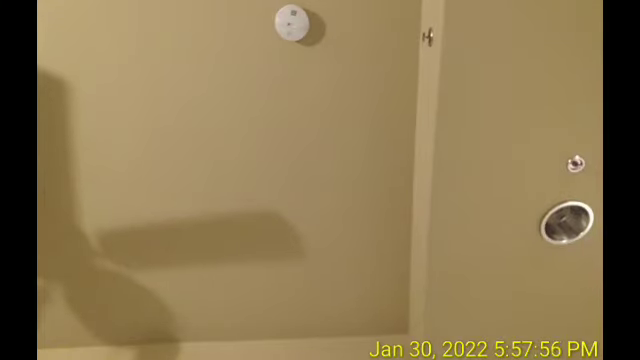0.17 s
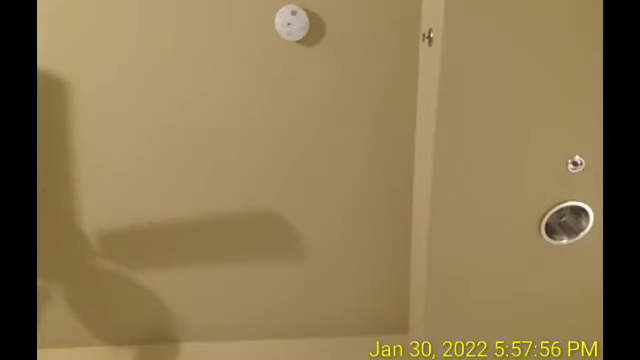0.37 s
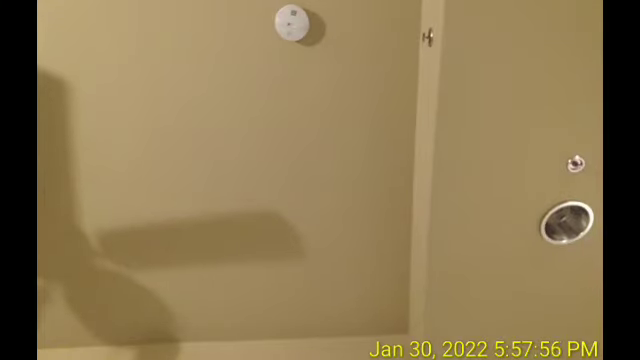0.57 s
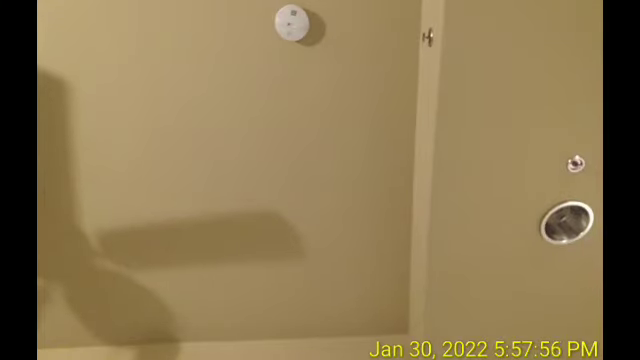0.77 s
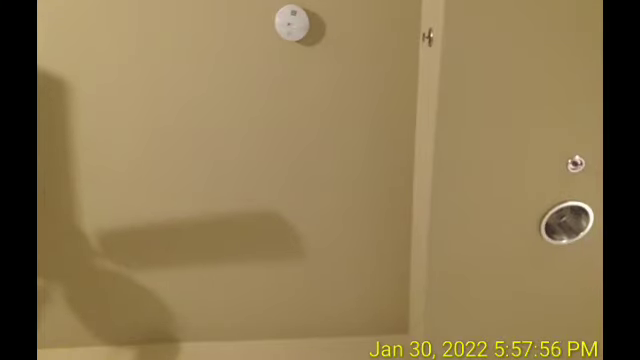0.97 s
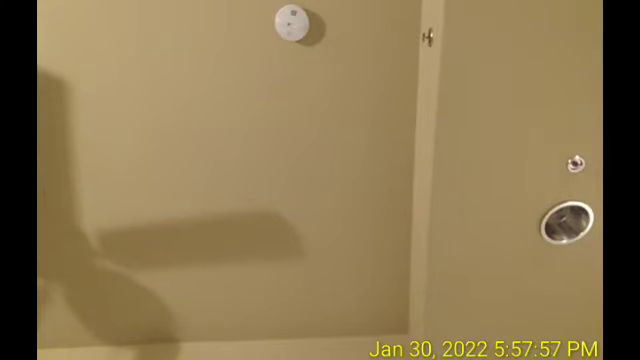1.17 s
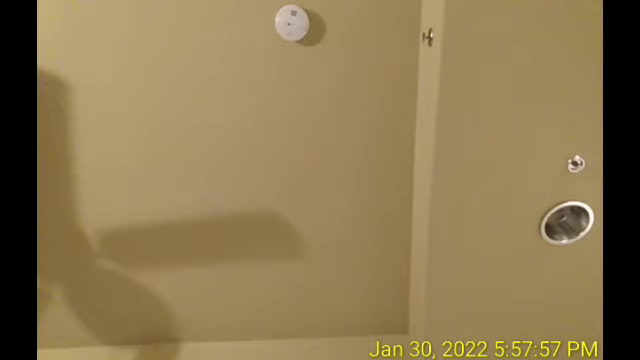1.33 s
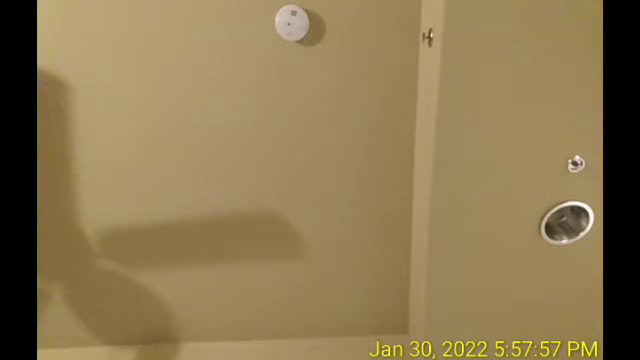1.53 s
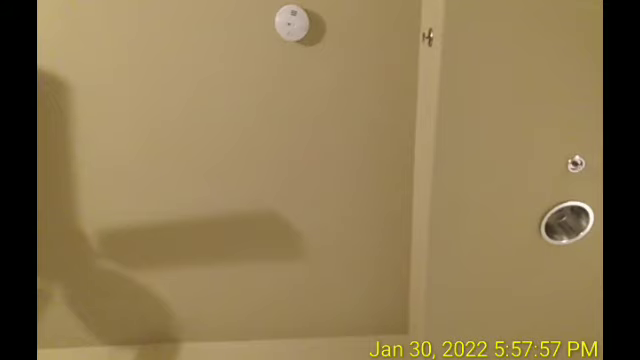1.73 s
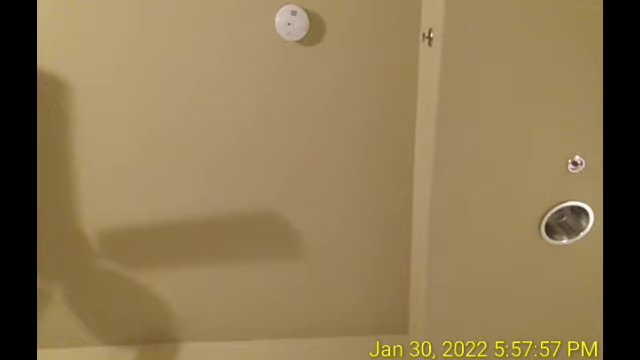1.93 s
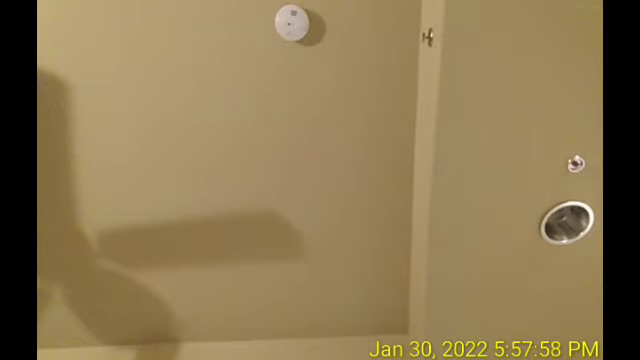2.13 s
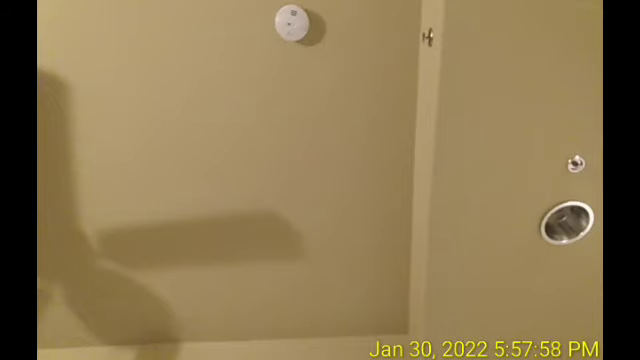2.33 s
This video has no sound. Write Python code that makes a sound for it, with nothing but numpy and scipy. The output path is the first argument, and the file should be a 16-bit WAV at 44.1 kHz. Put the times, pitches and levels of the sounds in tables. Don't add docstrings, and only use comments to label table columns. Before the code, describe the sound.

Heavy muffled footsteps overhead thump twice in the first second with deep, boomy ceiling resonance, then fade to quiet room tone and a few faint low steps near the end, picked up by a small indoor camera microphone.

```python
import sys
import numpy as np
from scipy import signal
from scipy.io import wavfile

SR = 44100
rng = np.random.default_rng(int(sys.argv[2]) if len(sys.argv) > 2 else 0)


def decibels_to_gain(level_db):
    exponent = np.asarray(level_db, float) / 20
    return 10 ** exponent


def pcm_store(signal):
    levels = np.round(np.clip(np.atleast_2d(signal), -1, 1) * 32767)
    wavfile.write(sys.argv[1], SR, levels.astype(np.int16).T)


N = 105840

# start in seconds, free ring in seconds,
# boom level in dB, joist level in dB, panel level in dB.
THUMPS = [(0.226, .03, -50, -72, -63), (.236, .22, -37, -35.5, -45), (0.263, 0.046, -33.5, -63, -60.5),
          (.286, 0.026, -52, -38, -60), (0.31, .04, -50, -30.5, -48), (0.387, 0.048, -42.5, -43, -58.5),
          (0.494, 0.074, -41.5, -49.5, -56), (0.618, 0.037, -42.5, -57.5, -72),
          (.668, 0.076, -32.5, -45, -40.5), (0.695, 0.07, -41.5, -53, -48), (.719, 0.038, -43, -36.5, -42),
          (0.741, 0.012, -43, -48, -56), (0.769, 0.162, -30.5, -41.5, -46.5), (.845, 0.044, -56, -66, -61),
          (.894, 0.036, -57, -65, -53), (.968, 0.22, -41.5, -64, -62), (1.029, 0.074, -65, -55.5, -66),
          (1.128, 0.058, -50, -54, -66)]
# frequency in Hz, level in dB, T60 in seconds, swell in seconds.
BOOM_MODES = [(40.59, -0.5, 0.99, 0.014), (60, -5.5, 0.1, 0.0067), (27.5, -14, 0.17, 0.06)]
JOIST_MODES = [(74.67, -2, 0.93, 0.005), (85.3, 4, 0.15, 0.016), (59.3, -10, .3, 0.031)]
PANEL_MODES = [(104.1, 3, 0.4, 0.007), (144.9, 0.5, .35, 0.0043), (138, -7.5, .25, 0.0043),
               (179.4, -9, .25, 0.0093), (220.6, -16.5, 0.18, 0.0022), (252, -16.5, 0.067, 0.01),
               (296.6, -20.5, 0.14, 0.002)]
# start in seconds, level in dB, pitch factor of the far joists.
FAR_STEPS = [
    (.042, -49, .98),
    (.14, -62, .75),
    (1.17, -55, 1.05),
    (1.9245, -58, .82),
    (1.942, -47, .82),
    (1.988, -52, 1.0),
    (2.016, -53, 1.02),
    (2.044, -49, 1.05),
    (2.15, -57, .88),
]
# frequency in Hz, level in dB, T60 in seconds, swell in seconds.
FAR_JOIST_MODES = [(70, 0, .2, .012), (42, -9, .25, .02), (108, -10, .2, .01)]
# start in seconds, level in dB.
BLOWS = [(.239, -63.5), (.30, -62), (.34, -76), (.40, -85), (0.511, -74.5), (0.679, -60.5), (0.729, -64.5),
         (.80, -76.5), (0.872, -69), (1.018, -74.5), (1.13, -88), (1.939, -80.5)]
# frequency in Hz, density in dB per Hz.
ANSWER_SPECTRUM = [(88, -37), (150, -9.5), (188, -11.5), (375, -19.5), (406, -21.5), (588, -26.5),
                   (908, -30.5), (2500, -31.5), (7000, -40), (9100, -48), (15400, -120)]
# frequency in Hz, T60 in seconds.
ANSWER_T60 = [(200, 1), (800, 1), (2500, 0.59), (6000, 0.1)]
# frequency in Hz, width in Hz, level in dB.
FIXTURE_RESONANCES = [(2250, 300, -2), (2480, 300, 0), (2750, 300, -1), (3100, 350, -4)]
# frequency in Hz, width in Hz, level in dB.
BOARD_RESONANCES = [(400, 120, -1), (940, 200, 1), (1830, 150, -1), (2000, 150, -1), (2350, 350, -6)]
# frequency in Hz, level in dB rms.
HUM_LINES = [(59.2, -73), (177.6, -77.5), (236.9, -86)]
# frequency in Hz, density in dB per Hz.
AIR_SPECTRUM = [(18, -11.5), (60, -5), (150, -15.5), (250, -12), (400, -17), (600, -22), (1000, -27),
                (2500, -36)]
# frequency in Hz, density in dB per Hz.
HISS_SPECTRUM = [(880, -22.5), (1500, -11.5), (2030, -21), (2150, -11.5), (4160, -6.5), (5310, -12),
                 (15300, -10)]
# time in seconds, level in dB.
GATE = [(0, -84.5), (0.237, -85.5), (0.241, -71.5), (.262, -75), (.3, -75.5), (.315, -76), (.47, -81.5),
        (.63, -83.5), (.674, -84), (0.688, -66.5), (.72, -73.5), (.76, -77.5), (.86, -80), (.92, -79),
        (1.09, -83), (1.11, -84.5), (1.3, -84.5), (2.4, -85)]
# frequency in Hz, side over mid in dB.
WIDTH = [(60, -12.5), (110, -7), (200, -14), (380, -8), (700, -2), (1280, 2.5), (2370, -0.5), (4370, 2),
         (8060, -1), (14900, 2.5)]

MODE_SPREAD_DB, SETTLED_T60_S = 5.5, 0.16
CEILING_SIDE_DB, CEILING_LAG_S = -22, 0.0015
SWAY_END_S, SWAY_FADE_S, SWAY_DB, SWAY_HZ = 1.68, 0.046, -63, 39.5
ANSWER_SWELL_S, ANSWER_DB, ANSWER_PATCH_DB, ANSWER_PATCH_HZ = 0.0083, 7.5, 0.53, 35
TICK_S, TICK_DB, TICK_T60_S, TICK_SWELL_S = 0.3095, -56, 0.075, 0.002
SCUFF_S, SCUFF_LEN_S, SCUFF_EDGE_S, SCUFF_DB = 1.638, 0.095, 0.025, -76
HUM_WOBBLE_DB, HUM_WOBBLE_HZ = 2, 5.8
AIR_DB, AIR_PATCH_DB, AIR_PATCH_HZ = -68, 1.4, 6
HISS_OFFSET_DB = 6
LEAN_DB, CUTOFF_HZ = -0.3, 15480

TIME_S = np.arange(N) / SR


def rms_one(x):
    return x / np.sqrt(np.mean(x ** 2) + 1e-20)


def at_hz(points, hz):
    table_hz, values = np.array(points).T
    return np.interp(np.log(hz), np.log(np.maximum(table_hz, 1)), values)


def drift(rate_hz):
    pole = np.exp(-80 * np.pi * rate_hz / SR)
    white = rng.standard_normal(N // 40 + 2002)
    slow = signal.lfilter([1], [1, -2 * pole, pole * pole], white)[2000:]
    return np.interp(np.arange(N) / 40, np.arange(len(slow)), rms_one(slow))


def strike(start_s, t60_s, swell_s):
    since_s = np.maximum(TIME_S - start_s, 0)
    swell = 1 - np.exp(-since_s / max(swell_s, 1e-4))
    return since_s, swell * decibels_to_gain(-60 * since_s / t60_s)


def bands(spectrum):
    edges_hz = 14 * 2 ** np.arange(0, 10.8, 0.5)
    white = rng.standard_normal((2, 2, N + 8000))
    low_end_hz, high_end_hz = spectrum[0][0] / 1.5, spectrum[-1][0] * 1.2
    for k, (low_hz, high_hz) in enumerate(zip(edges_hz, edges_hz[1:])):
        hz = np.sqrt(low_hz * high_hz)
        if low_end_hz < hz < high_end_hz:
            sos = signal.butter(2, [low_hz, high_hz], "band", fs=SR, output="sos")
            mid, side = signal.sosfilt(sos, white[k % 2])[:, -N:]
            wide = decibels_to_gain(at_hz(WIDTH, hz))
            stereo = (mid + wide * side * [[1], [-1]]) / np.sqrt(1 + wide ** 2)
            yield hz, decibels_to_gain(at_hz(spectrum, hz)) * stereo


def resonances(table):
    out, rub = 0, rng.standard_normal((2, N))
    for hz, width_hz, db in table:
        pole = np.exp(-np.pi * width_hz / SR)
        b = [1, 0, -1.065]
        a = [1, -2 * pole * np.cos(2 * np.pi * hz / SR), pole * pole]
        ringing = signal.lfilter(b, a, signal.lfilter(b, a, rub))
        out = out + decibels_to_gain(db) * rms_one(ringing)
    return rms_one(out)


def hum():
    out = np.zeros(N)
    for hz, db in HUM_LINES:
        peak = decibels_to_gain(db + 4 + HUM_WOBBLE_DB * drift(HUM_WOBBLE_HZ))
        out += peak * np.sin(2 * np.pi * hz * TIME_S + rng.uniform(0, 2 * np.pi))
    return out


def room_air():
    air = sum(noise * decibels_to_gain(AIR_PATCH_DB * drift(AIR_PATCH_HZ)) for hz, noise in bands(AIR_SPECTRUM))
    return decibels_to_gain(AIR_DB) * rms_one(air)


def hiss():
    gate_s, gate_db = np.transpose(GATE)
    level_db = np.interp(TIME_S, gate_s, gate_db) + HISS_OFFSET_DB
    return decibels_to_gain(level_db) * rms_one(sum(noise for hz, noise in bands(HISS_SPECTRUM)))


def sway():
    level = decibels_to_gain(2.0 * drift(1.7))
    deep = level * np.sin(2 * np.pi * SWAY_HZ * TIME_S + 0.5 * drift(1.3))
    return decibels_to_gain(SWAY_DB) * deep * np.clip((SWAY_END_S - TIME_S) / SWAY_FADE_S + 1, 0, 1)


def far_steps():
    out = np.zeros(N)
    for start_s, level_db, pitch in FAR_STEPS:
        for hz, db, t60_s, swell_s in FAR_JOIST_MODES:
            since_s, shape = strike(start_s, t60_s, swell_s)
            out -= decibels_to_gain(level_db + db) * shape * np.sin(2 * np.pi * hz * pitch * since_s)
    return out


def ceiling():
    out = np.zeros(N)
    spread = rng.standard_normal((len(THUMPS), 16))
    for (start_s, free_s, *levels_db), chance in zip(THUMPS, spread):
        settled_s = np.maximum(TIME_S - start_s - free_s, 0)
        damped = decibels_to_gain(-60 * settled_s / SETTLED_T60_S)
        for level_db, modes in zip(levels_db, (BOOM_MODES, JOIST_MODES, PANEL_MODES)):
            for k, (hz, db, t60_s, swell_s) in enumerate(modes):
                since_s, shape = strike(start_s, t60_s, swell_s)
                mode_db = level_db + db + MODE_SPREAD_DB * chance[k] * (k > 0)
                out -= decibels_to_gain(mode_db) * shape * damped * np.sin(2 * np.pi * hz * since_s)
    return out


def room_answer():
    out, flat_power = 0, 0
    for hz, noise in bands(ANSWER_SPECTRUM):
        t60_s = at_hz(ANSWER_T60, hz)
        power = sum(decibels_to_gain(2 * db) * strike(s, t60_s, ANSWER_SWELL_S)[1] ** 2 for s, db in BLOWS)
        out = out + np.sqrt(power) * noise * decibels_to_gain(ANSWER_PATCH_DB * drift(ANSWER_PATCH_HZ))
        flat_power += np.mean(noise ** 2)
    return out * decibels_to_gain(ANSWER_DB) / np.sqrt(flat_power)


def fixture():
    since_s, shape = strike(TICK_S, TICK_T60_S, TICK_SWELL_S)
    return decibels_to_gain(TICK_DB) * shape * resonances(FIXTURE_RESONANCES)


def scuff():
    since_s = TIME_S - SCUFF_S
    left_s = SCUFF_LEN_S + SCUFF_EDGE_S - since_s
    shape = np.clip(np.minimum(since_s, left_s) / SCUFF_EDGE_S, 0, 1)
    return decibels_to_gain(SCUFF_DB) * shape * resonances(BOARD_RESONANCES)


def scene():
    above = ceiling() + far_steps()
    late = np.interp(np.arange(N) - CEILING_LAG_S * SR, np.arange(N), above)
    above = above + decibels_to_gain(CEILING_SIDE_DB) * late * [[1], [-1]]
    return above + hum() + room_air() + sway() + room_answer() + fixture() + scuff()


def band_limit(x):
    return signal.sosfilt(signal.butter(12, 15480, fs=SR, output="sos"), x)


def record(dry):
    heard = (dry + hiss()) * decibels_to_gain(np.array([[LEAN_DB], [-LEAN_DB]]))
    low_pass = signal.ellip(10, 0.5, 70, CUTOFF_HZ, fs=SR, output="sos")
    return band_limit(signal.sosfilt(low_pass, heard))


dry = scene()
out = record(dry)
pcm_store(out)
```